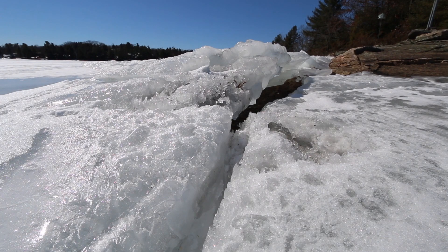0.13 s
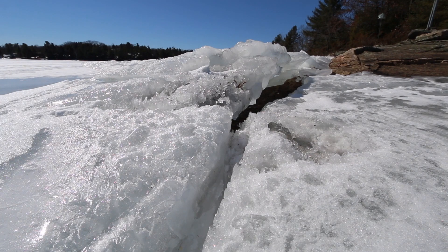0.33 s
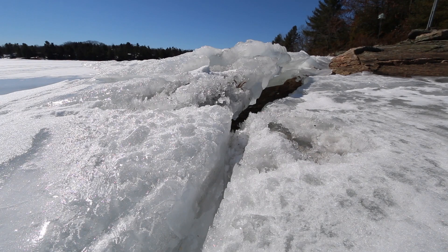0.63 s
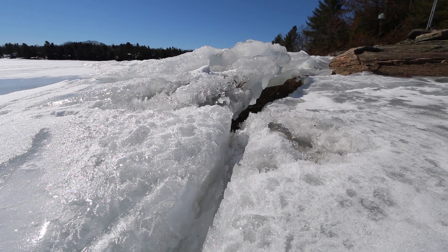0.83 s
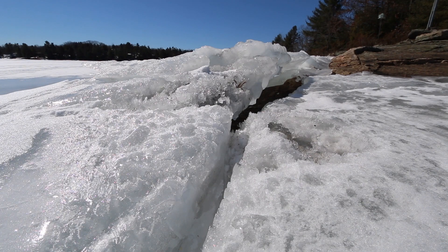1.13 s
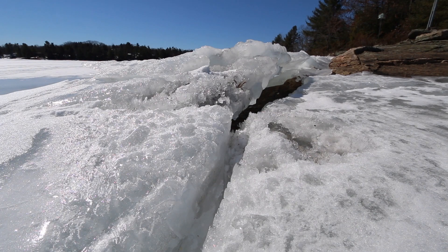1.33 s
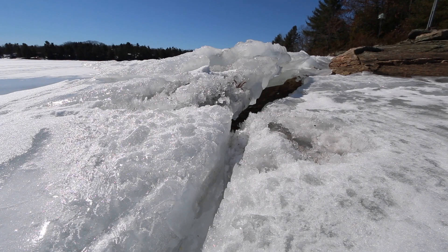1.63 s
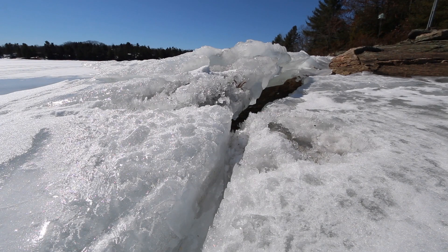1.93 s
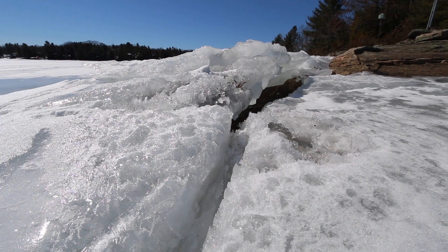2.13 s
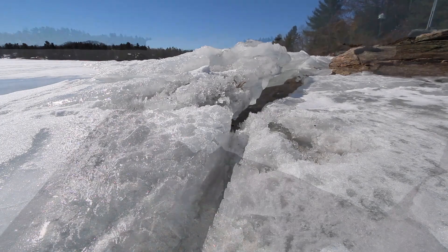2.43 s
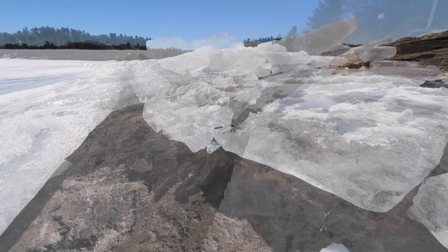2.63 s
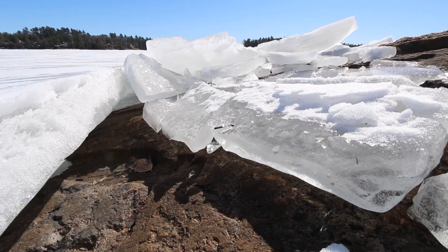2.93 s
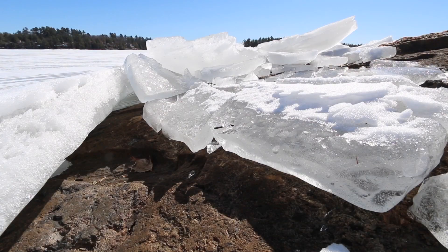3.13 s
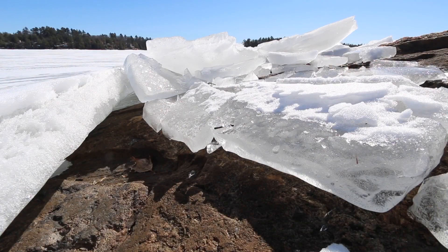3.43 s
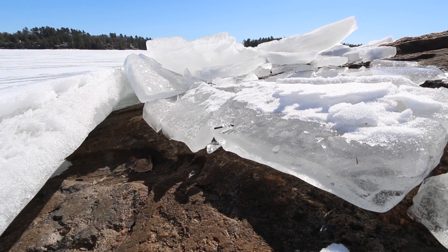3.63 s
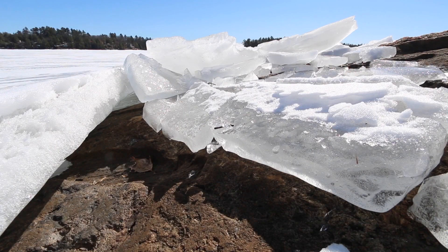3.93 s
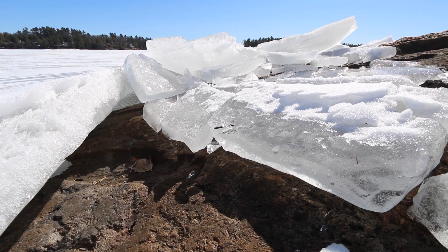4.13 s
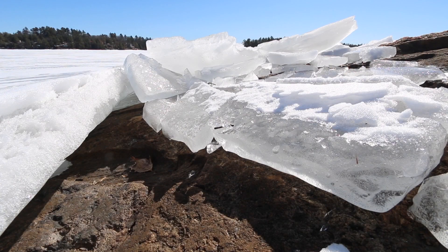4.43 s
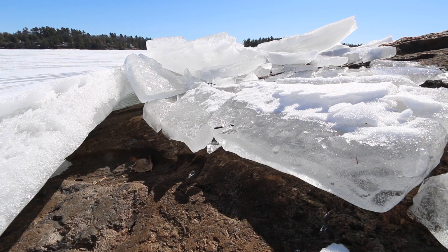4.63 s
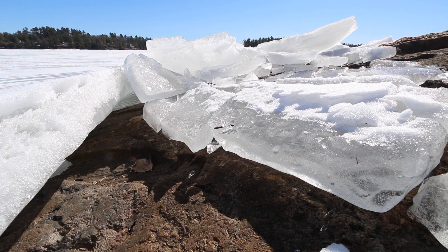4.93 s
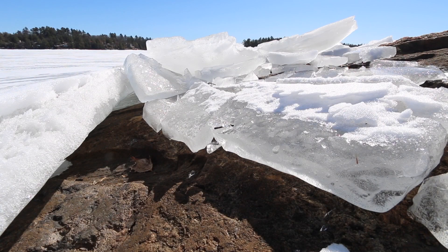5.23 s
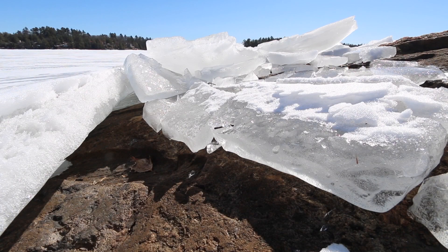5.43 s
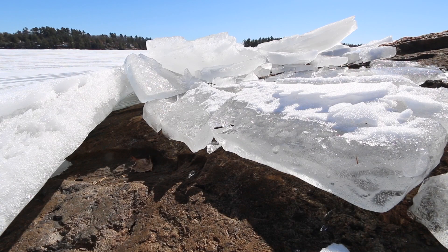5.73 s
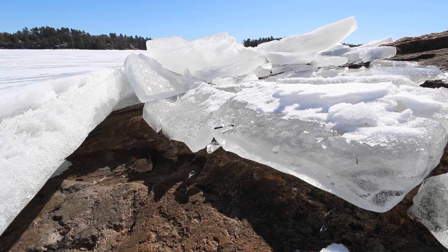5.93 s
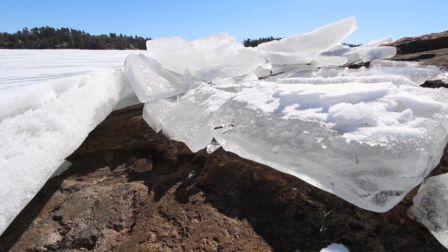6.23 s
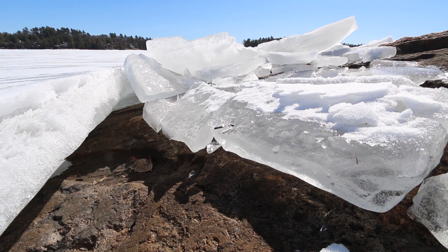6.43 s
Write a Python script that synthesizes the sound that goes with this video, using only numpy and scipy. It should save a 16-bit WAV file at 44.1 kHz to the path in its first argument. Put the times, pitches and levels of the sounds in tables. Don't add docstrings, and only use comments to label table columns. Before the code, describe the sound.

Lake ice cracks and booms against a rocky shore, one loud knock early, scattered thuds and ticks, then a cluster of heavy booms at the end.

```python
import sys
import numpy as np
from scipy import signal
from scipy.fft import rfft, irfft, next_fast_len
from scipy.io import wavfile
from scipy.ndimage import uniform_filter1d

SR = 44100
rng = np.random.default_rng(int(sys.argv[2]) if len(sys.argv) > 2 else 0)


def to_wav(sig):
    pcm = np.clip(np.atleast_2d(sig), -1, 1) * 32767
    pcm = np.round(pcm).astype(np.int16)
    wavfile.write(sys.argv[1], SR, pcm.T)


def voltage_ratio(decibels):
    exponent = np.asarray(decibels, float) / 20
    return 10 ** exponent


N = 289737


def unit(x):
    return x / np.sqrt(np.mean(x ** 2) + 1e-30)


def colour(x, points):
    n = x.shape[-1]
    size = next_fast_len(n + 4096)
    tail = x[..., :-4097:-1] * np.hanning(8192)[4096:]
    spectrum = rfft(np.concatenate([x, tail], axis=-1), size)
    hz = np.maximum(np.fft.rfftfreq(size, 1 / SR), 1)
    f, db = np.transpose(points)
    gain = voltage_ratio(np.interp(np.log(hz), np.log(f), db))
    return irfft(spectrum * gain, size)[..., :n]


def add(out, s, sound):
    i = int(s * SR)
    out[i:i + len(sound)] += sound[:N - i]


def bend(x, lag_s):
    hz = np.fft.rfftfreq(len(x), 1 / SR)
    return irfft(rfft(x) * np.exp(-4j * np.pi * lag_s * np.sqrt(100 * hz)), len(x))


def slips(size, per_s, scatter_db):
    k = int(SR / per_s)
    steps = voltage_ratio(scatter_db * rng.standard_normal(size // k + 1))
    level = uniform_filter1d(np.repeat(steps, k)[:size], k // 2 + 1)
    return unit(rng.standard_normal(size) * level)


def hiss_dips():
    # t/s, length/s, depth/dB
    moments = [
        (2.55, .3, -2),
        (6.342, .14, -6.5),
        (6.345, .21, -3),
    ]
    t, edge_s = np.arange(N) / SR, 0.045
    gain_db = np.zeros(N)
    for s, length_s, db in moments:
        inside = np.minimum(t - s, s + length_s - t)
        gain_db += db * np.clip(inside / edge_s + .5, 0, 1)
    return gain_db


def preamp_hiss():
    # f/Hz, level/dB
    spectrum = [(35, -78.5), (60, -38), (308, -36), (380, -5.5), (469, 0.5), (862, -3), (1250, -0.5),
                (1820, -0.5), (2140, -0.5), (13300, -2), (16000, -4.5)]
    own = colour(rng.standard_normal((2, N)), spectrum)
    shared = colour(rng.standard_normal(N), spectrum)
    return voltage_ratio(-65 + hiss_dips()) * unit(own + 0.34 * shared)


def far_ice():
    # t/s, level/dB
    unrest = [(0.0, -55), (0.44, -55.5), (0.84, -57.5), (0.99, -52.5), (1.5, -53.5), (1.66, -52.5),
              (2.14, -54), (2.54, -59.5), (2.74, -56.5), (3.42, -55), (4.04, -54.5), (4.34, -57.5),
              (4.9, -57.5), (5.3, -52.5), (5.76, -56.5), (6.29, -56), (6.51, -32), (6.57, -42)]
    # f/Hz, level/dB
    bass_spectrum = [(18, -32), (30, 13), (48, -2.5), (75, -0.5), (93, 2.5), (108, -23), (150, -10.5),
                     (200, -14), (260, -48), (440, -120)]
    upper_spectrum = [(65, -47), (110, -5.5), (157, -1.5), (209, -8), (229, -13), (278, -11), (578, -18),
                      (1600, -33.5), (2000, -37.5), (2500, -38), (3250, -40), (5500, -120)]
    bass = unit(colour(slips(N, per_s=8.4, scatter_db=3.5), bass_spectrum))
    upper = bend(slips(N, per_s=27, scatter_db=1.9), lag_s=0.053)
    upper = unit(colour(upper, upper_spectrum))
    s, db = np.transpose(unrest)
    return voltage_ratio(np.interp(np.arange(N) / SR, s, db)) * (voltage_ratio(3.5) * bass + voltage_ratio(-0.5) * upper)


def squeaks():
    # t/s, length/s, f/Hz, level/dB
    rubs = [(1.06, .045, 3720, -74), (1.10, .15, 3500, -77), (1.15, .09, 2255, -74), (1.27, .1, 1665, -75),
            (1.36, .07, 4130, -76), (1.38, .17, 2400, -73), (1.40, .13, 3200, -70), (1.51, .18, 2680, -72),
            (1.52, .17, 3520, -77), (1.67, .36, 2100, -75), (1.68, .1, 2615, -69), (4.44, .11, 1950, -76),
            (4.45, .09, 2880, -77), (4.46, .10, 3900, -80), (4.73, .09, 2900, -79)]
    # t/s, length/s, f/Hz, level/dB
    groans = [
        (0, 0.34, 82.1, -50.5),
        (0, 0.25, 195, -61),
        (.45, 0.28, 195, -58.5),
        (1.68, .17, 82.7, -46.5),
        (2.55, 0.21, 77.5, -55.5),
        (3.2, 0.27, 72.5, -52),
        (3.5, .32, 75.9, -55.5),
        (4.55, .35, 154.4, -65.5),
        (5.7, 0.52, 155.8, -60.5),
        (5.8, .2, 84.6, -58),
    ]
    out = np.zeros(N)
    for s, length_s, start_hz, db in rubs + groans:
        n = int(length_s * SR)
        drift = rng.standard_normal((2, 35))
        waver, wobble = (np.interp(np.arange(n), np.arange(0, 22050, 630), row) for row in drift)
        swell = np.sin(np.pi * np.arange(n) / n) ** .4
        hz = start_hz * (np.linspace(1, 1 - .009, n) + .003 * wobble)
        tone = np.sin(2 * np.pi * np.cumsum(hz) / SR)
        add(out, s, voltage_ratio(db + 3.0 + 3.2 * waver) * swell * tone)
    return out


def ticks(size=8192):
    # t/s, peak level/dB, top level/dB
    snaps = [(0.2982, -21, -24), (0.497, -54, -11), (0.881, -44.5, 1.5), (1.036, -44.5, -12.5),
             (1.3636, -50, -11), (1.498, -40.5, -13), (1.917, -44, -17.5), (1.982, -52.5, -15),
             (2.802, -56, -11), (3.389, -55.5, -8.5), (4.641, -61, -7), (5.052, -50.5, -8)]
    # t/s, peak level/dB, top level/dB
    scrapes = [(0.269, -50, -12), (0.306, -36.5, -27), (0.791, -55, -17), (0.829, -49, -17.5),
               (0.918, -50.5, -16.5), (1.1378, -49, -12), (1.824, -64, -8.5), (1.8503, -47, -11),
               (2.109, -59, -21.5), (2.132, -46, -21.5), (2.251, -49.5, -20), (2.38, -50, -17.5),
               (2.4636, -53.5, -16), (2.8866, -53.5, -8), (3.9298, -60.5, -5), (4.12, -49.5, -17),
               (4.791, -52.5, -11), (4.8986, -59, -9.5), (5.0955, -41.5, -23.5), (5.2972, -55, -17),
               (5.6123, -52.5, -1), (5.97, -48.5, -13), (6.1877, -42.5, -9), (6.3325, -34.5, -34),
               (6.4034, -47.5, -32), (6.47, -50.5, -27), (6.519, -56, -24), (6.435, -50, -26),
               (6.493, -54.5, -23), (6.55, -53, -24)]
    snap_s, scrape_s = 0.035, 0.089
    out, t = np.zeros(N), np.arange(size) / SR
    for s, db, top_db, length_s in [row + (snap_s,) for row in snaps] + [row + (scrape_s,) for row in scrapes]:
        fade = t / length_s
        lumps = [(hz, 2.5 * lump) for hz, lump in zip(np.arange(400, 6400, 250), rng.standard_normal(24))]
        grit = colour(slips(size, per_s=400, scatter_db=3.5), lumps)
        grit = unit(colour(grit, [(500, -11), (1500, -9.0), (3800, -10.5), (5000, -16), (9000, -31)]))
        air = unit(colour(rng.standard_normal(size), [(3000, -25.5), (6000, -4.5), (16000, -12)]))
        air = air * voltage_ratio(top_db + 6.5 - 13 * fade)
        onset = 1 - np.exp(-fade / 0.034)
        add(out, s - .0015, voltage_ratio(db - 7.5 - 22.6 * fade - 28 * fade ** 2) * onset * (grit + air))
    return out


def knocks(size=16384):
    # f/Hz, level/dB, ring/s
    big_block = [(327.7, -4.5, 0.17), (805, -12.5, 0.088), (511, 0.5, 0.066), (950, -7, 0.055),
                 (2300, -5, .035), (2540, -7, 0.021), (2950, -5, 0.023), (3080, -5, 0.033), (3500, -7, .03),
                 (3860, -8.5, 0.023), (4230, -13.5, 0.025), (5760, -13.5, 0.023)]
    thin_shard = [(1140, -14, 0.063), (1475, 2, 0.072), (2010, 2.5, 0.089), (2083, 2.5, .08),
                  (3180, -0.5, 0.066), (4700, -14.5, .05)]
    thick_shard = [(336, -2, .17), (781, -15, .09), (1079, 9, 0.12), (1140, -18, .1), (2580, -2.5, 0.088),
                   (2790, -5, .07), (3130, -7, 0.064), (3989, -16.5, 0.055)]
    hollow = [(629, 0, 0.094), (702, -7, 0.13)]
    slab_ring = [(150.7, 2, 0.41), (85.6, -10, 0.45), (203, -9.5, 0.36)]
    chip = [(4100, -3, 0.045), (2290, -3, .06), (1900, -4, .06)]
    # t/s, peak level/dB
    big_blows = [
        (.3013, -6),
    ]
    thin_blows = [
        (1.850, -45),
        (4.791, -50.5),
        (5.049, -52),
        (5.612, -40.5),
        (5.971, -61),
    ]
    thick_blows = [
        (2.465, -52),
        (5.705, -56.5),
        (6.186, -31.5),
    ]
    hollow_blows = [
        (1.79, -48.5),
        (1.824, -47),
        (3.313, -49.5),
        (3.36, -54),
        (3.73, -57),
        (4.119, -47.5),
        (5.484, -47.5),
    ]
    slab_blows = [
        (.309, -17.5),
        (.366, -26),
        (5.2, -30.5),
        (6.35, -22),
    ]
    chip_blows = [
        (5.971, -51),
        (4.121, -61.5),
        (1.8, -57),
    ]
    # blows, modes, chatter/s, splinter level/dB
    blocks = [(big_blows, big_block, .0015, -32), (thin_blows, thin_shard, .004, -19),
              (thick_blows, thick_shard, .006, -24), (hollow_blows, hollow, .004, -45),
              (slab_blows, slab_ring, .004, -60), (chip_blows, chip, .005, -16)]
    out, t = np.zeros(N), np.arange(size) / SR
    for blows, modes, chatter_s, splinter_db in blocks:
        for s, db in blows:
            ring = np.zeros(size)
            for hz, mode_db, ring_s in modes:
                t60 = min(0.91 * ring_s, .4)
                mode_hz = hz * (1 + .003 * rng.standard_normal())
                ring += voltage_ratio(mode_db - 60 * t / t60) * np.sin(2 * np.pi * mode_hz * t)
            chatter = rng.standard_normal(size) * np.exp(-t / chatter_s)
            ring = ring + 0.082 * signal.fftconvolve(ring, chatter)[:size]
            splinters = np.diff(rng.standard_normal(size), prepend=0) * np.exp(-t / 0.0071)
            add(out, s, voltage_ratio(db) * (ring / np.abs(ring).max() + voltage_ratio(splinter_db) * splinters))
    return out


def booms(size=24576):
    # t/s, peak level at 200-600 Hz/dB, bass level/dB, treble level/dB
    near = [(0.26, -22, -41, -38.5), (0.299, -12, -31.5, -30.5), (0.879, -42.5, -38, -45.5),
            (1.451, -32, -38.5, -71), (1.484, -33.5, -36.5, -62), (1.923, -36.5, -54, -66),
            (2.153, -35, -47, -45.5), (2.465, -47, -53, -55.5), (3.167, -39, -50, -54),
            (4.119, -48, -41, -57), (5.172, -24, -30.5, -67), (5.209, -41, -28, -88),
            (6.186, -31, -52, -43), (6.402, -15, -20.5, -51), (6.466, -23.5, -19.5, -41),
            (6.509, -26, -21, -64), (6.549, -50, -33, -53)]
    middle = [(0.839, -36, -33.5, -50.5), (0.926, -42, -58, -53), (1.01, -43.5, -56, -66),
              (1.057, -39.5, -41, -68), (1.119, -49, -46, -53.5), (1.209, -41.5, -45, -58),
              (1.548, -45, -41, -92), (1.594, -53, -40, -85), (1.735, -47.5, -47, -86),
              (1.799, -50, -46, -69), (2.38, -65, -43.5, -50.5), (2.799, -56.5, -56, -67.5),
              (2.996, -34, -55.5, -57), (3.2, -54, -48, -78), (3.362, -37, -44, -75),
              (3.729, -43, -57, -91), (5.294, -24, -35.5, -42.5), (5.345, -34, -41, -71),
              (5.484, -52.5, -51, -82), (6.332, -6.5, -17.5, -24)]
    distant = [(0.369, -38, -38, -68), (0.783, -27, -37, -40), (2.102, -25.5, -33.5, -41),
               (3.311, -46, -57, -72), (3.386, -40.5, -42, -74), (3.427, -44, -43.5, -80),
               (3.54, -47, -53, -88), (3.913, -25, -47, -53.5), (3.969, -33.5, -38.5, -86),
               (4.03, -46, -37, -88), (4.099, -56, -57, -69), (4.513, -43.5, -73, -75),
               (4.885, -40.5, -48, -57), (5.097, -22.5, -40, -41)]
    # lag of 100 Hz/s, ring/s
    paths = [(near, (0.01017, .21)), (middle, (0.0179, .25)), (distant, (.03, 0.31))]
    out, t = np.zeros(N), np.arange(size) / SR
    octave = np.log2(np.maximum(np.fft.rfftfreq(size, 1 / SR), 1))
    front = (1 - np.exp(-t / 0.0014)) * voltage_ratio(1.03 * np.exp(-t / 0.0097))
    for s, body_db, bass_db, treble_db, lag_s, ring_s in [row + path for rows, path in paths for row in rows]:
        tear = rfft(slips(size, per_s=120, scatter_db=1.5))
        shape_hz, shape_db = np.transpose([
            (45, bass_db - 28.0), (100, bass_db - 2.0), (330, body_db - 9.5),
            (1500, treble_db - 7.0), (3000, treble_db - 29.5), (6000, treble_db - 40)])
        dying_s = np.maximum(t - 0.69 * lag_s, 0)
        wave = np.zeros(size)
        for hz in 45 * 2. ** np.arange(8):
            overlap = np.cos(np.pi / 2 * np.clip(octave - np.log2(hz), -1, 1))
            band = unit(irfft(tear * overlap, size))
            db = np.interp(np.log(hz), np.log(shape_hz), shape_db)
            t60 = ring_s * (hz / 300) ** -.3
            wave += voltage_ratio(db - 2.5 - 60 * dying_s / t60) * front * band
        add(out, s - .4 * lag_s, bend(wave, lag_s)[:size * 3 // 4])
    return out


def slab(x):
    # f/Hz, width/Hz, level/dB
    resonances = [(73.5, 30.6, -1.5), (150.1, 10, -6), (206, 13.5, 3), (260, 16, -8), (326.6, 15.6, -3),
                  (443.3, 7.6, -7.5), (854, 170, -17)]
    out = voltage_ratio(-3) * x
    for hz, width_hz, db in resonances:
        out = out + voltage_ratio(db) * signal.lfilter(*signal.iirpeak(hz, hz / width_hz, SR), x)
    return out


def scene():
    ice = slab(far_ice() + booms()) + squeaks() + ticks() + knocks()
    return np.array([ice, ice])


def top_cut(x):
    return signal.sosfilt(signal.butter(12, 16640, fs=SR, output="sos"), x)


def record(dry):
    cased = colour(dry, [(20, -22), (38, -15), (52, -3), (80, 0), (4200, 0), (4800, -6), (16000, -6)])
    balance = voltage_ratio(np.array([[.04], [-.04]]))
    return top_cut(cased * balance + preamp_hiss())


dry = scene()
out = record(dry)
to_wav(out)
```